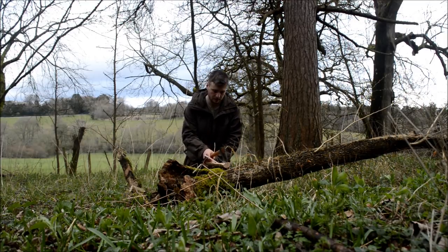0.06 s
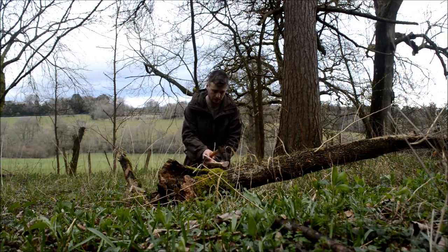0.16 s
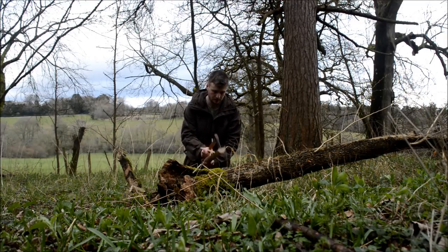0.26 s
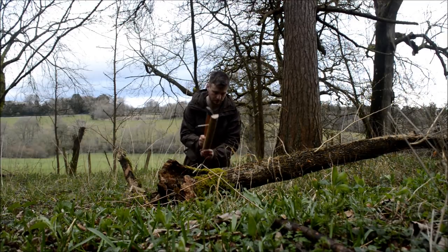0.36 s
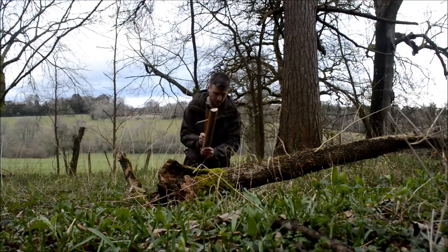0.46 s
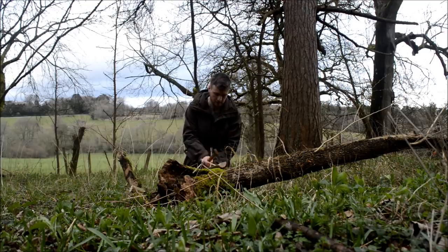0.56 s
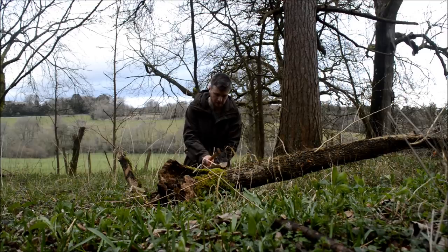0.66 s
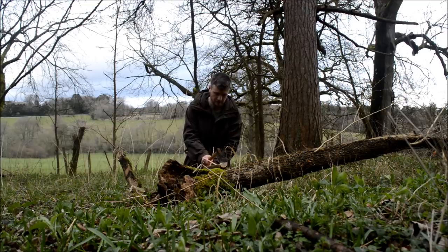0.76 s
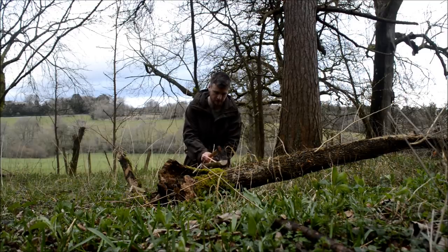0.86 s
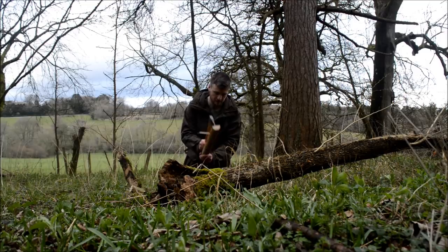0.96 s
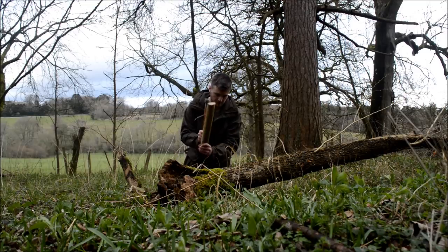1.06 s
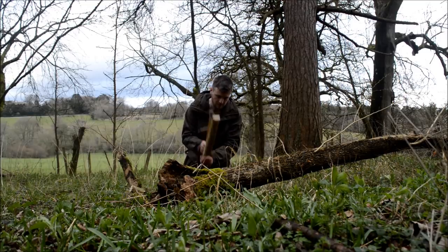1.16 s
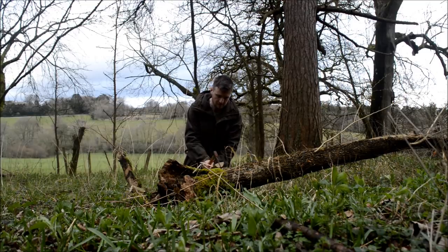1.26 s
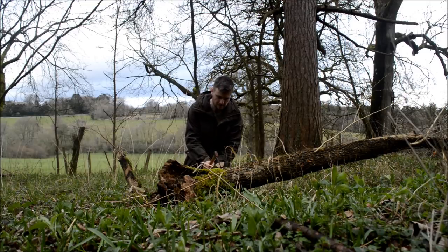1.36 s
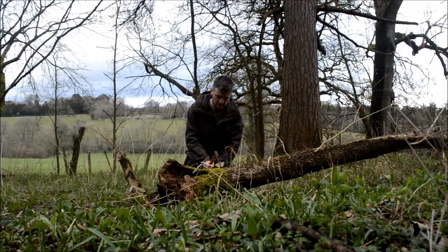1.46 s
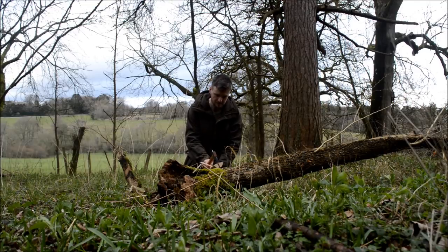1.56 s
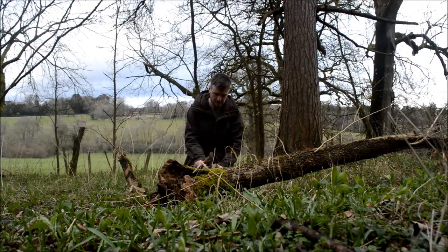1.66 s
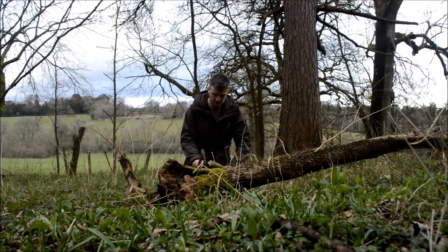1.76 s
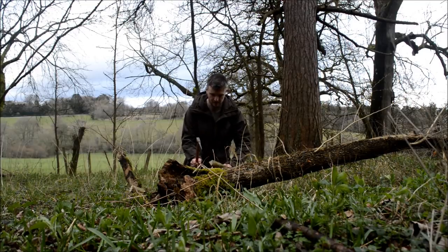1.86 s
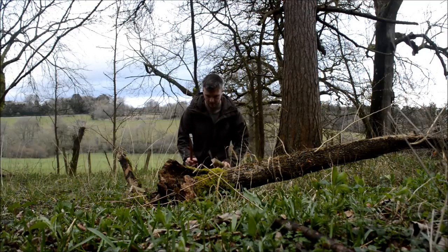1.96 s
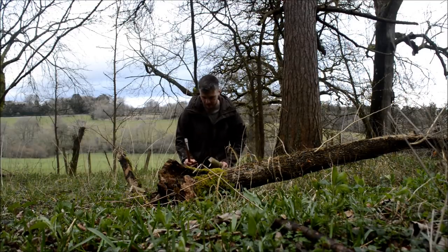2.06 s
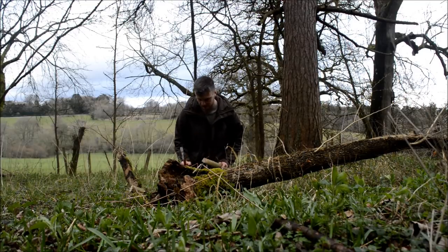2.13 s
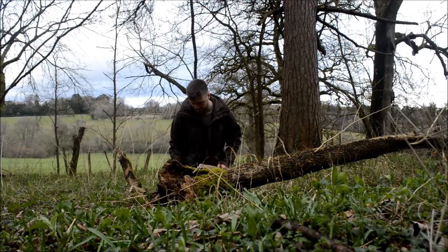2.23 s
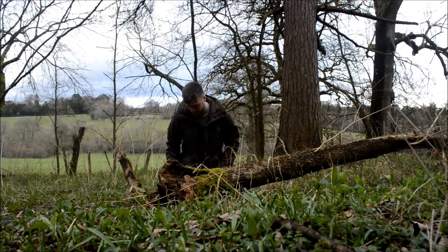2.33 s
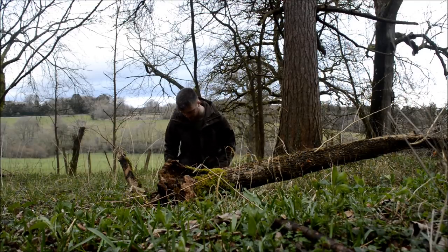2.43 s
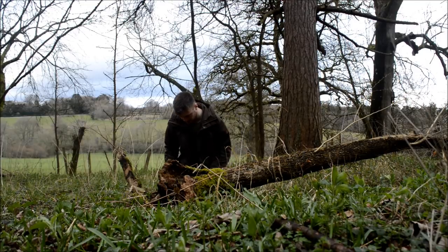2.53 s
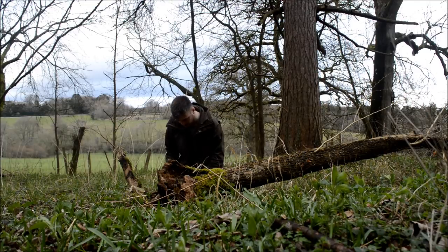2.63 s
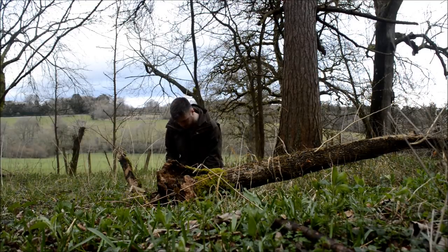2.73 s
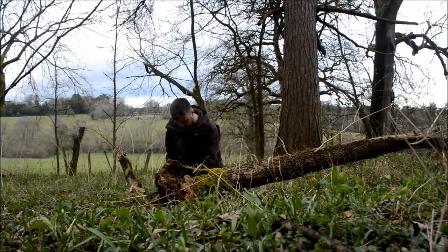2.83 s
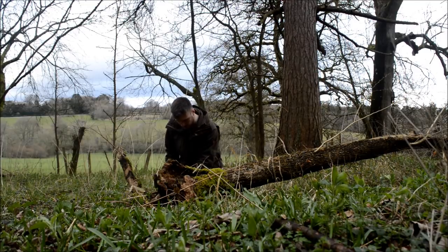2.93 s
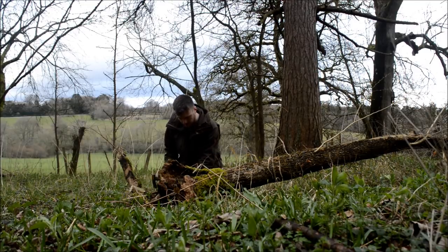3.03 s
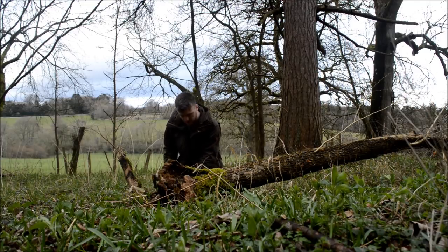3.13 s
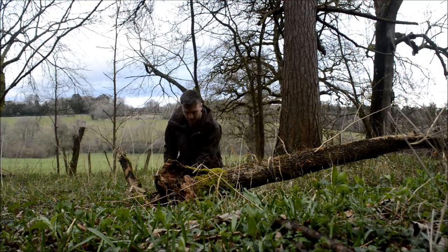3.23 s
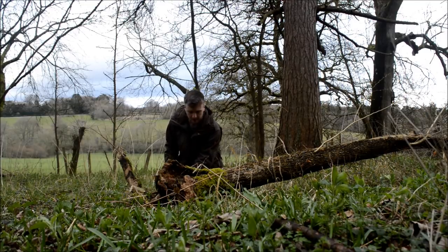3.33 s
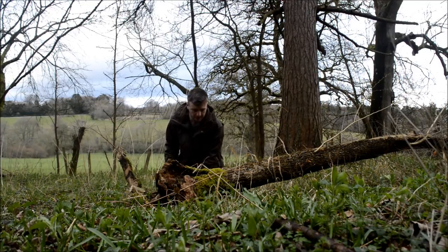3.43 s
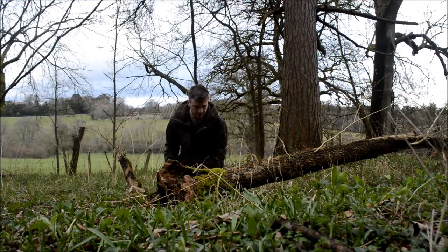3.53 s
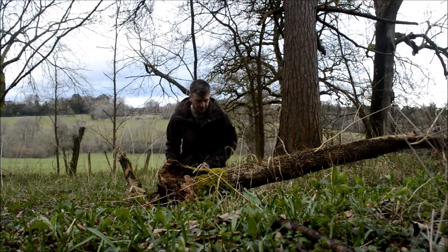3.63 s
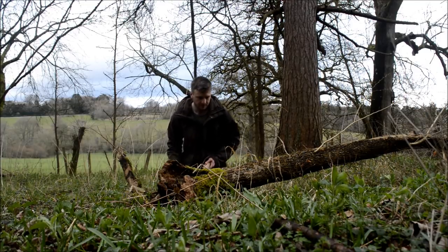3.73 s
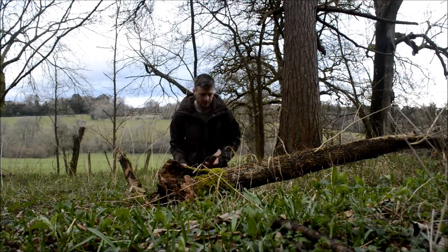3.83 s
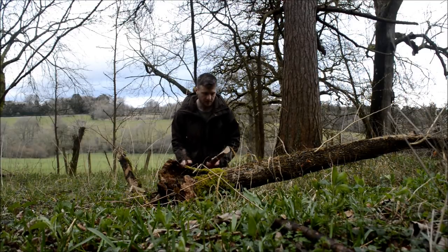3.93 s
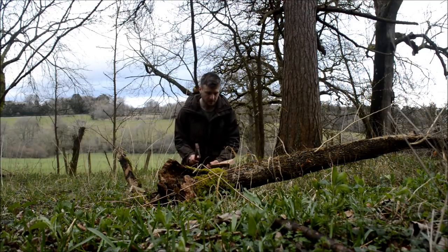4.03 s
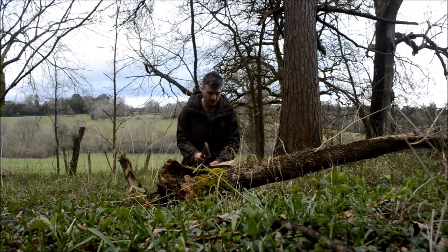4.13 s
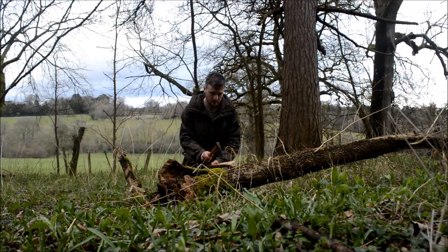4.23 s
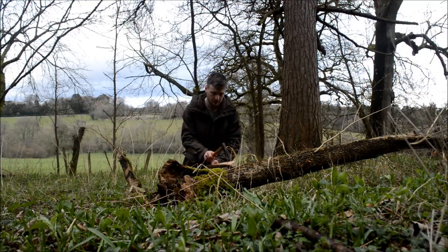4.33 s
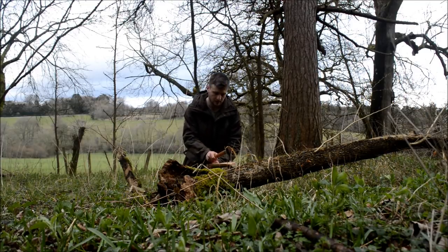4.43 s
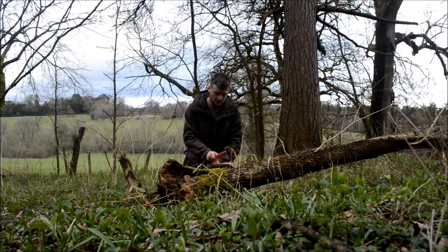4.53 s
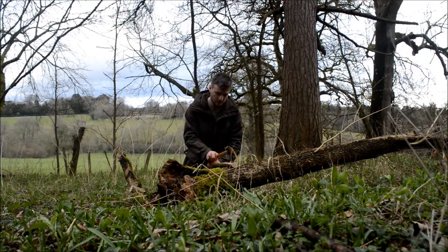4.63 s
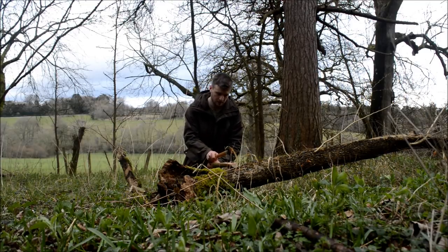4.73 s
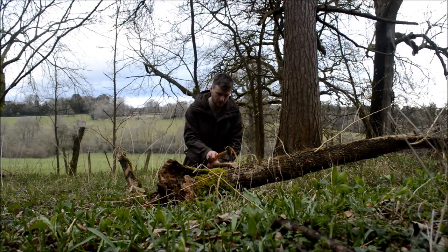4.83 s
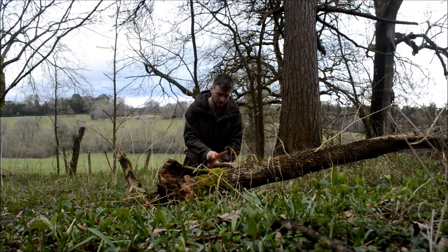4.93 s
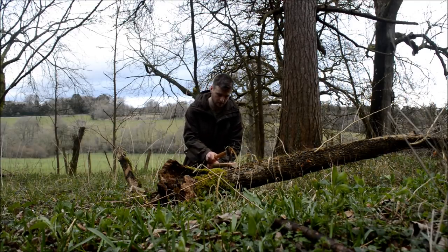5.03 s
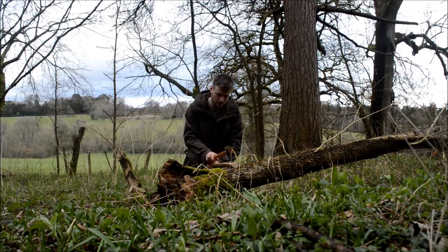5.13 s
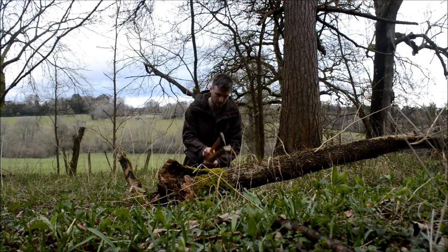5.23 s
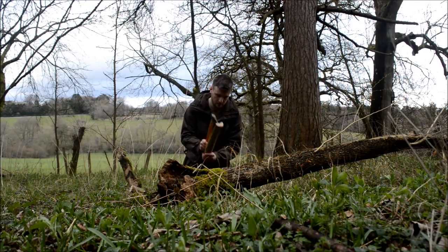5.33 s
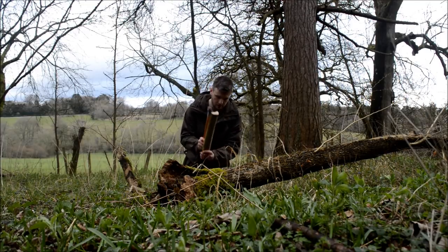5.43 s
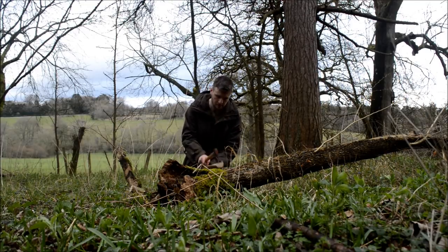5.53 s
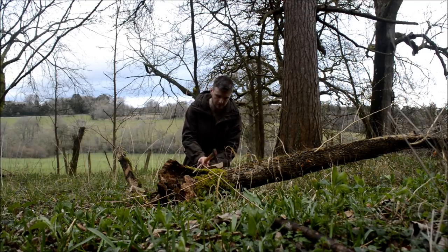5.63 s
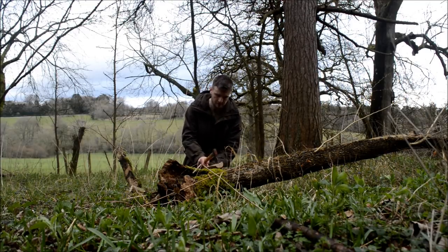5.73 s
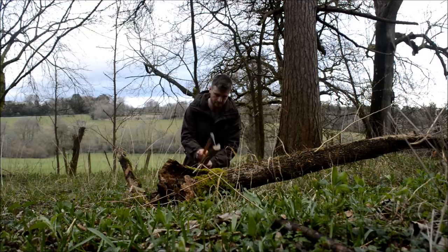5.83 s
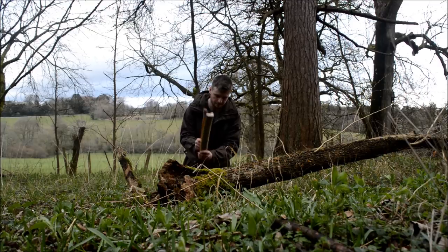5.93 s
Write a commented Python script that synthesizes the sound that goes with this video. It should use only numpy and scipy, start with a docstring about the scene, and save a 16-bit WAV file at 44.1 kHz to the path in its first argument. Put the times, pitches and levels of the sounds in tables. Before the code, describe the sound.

Two loud chops split a dry stick that rips open and drops in pieces; later another hard chop, with distant birds whistling.

```python
"""At the edge of a wood, kindling is split with a small hatchet on a fallen log, a few metres from the microphone.
Chops are sums of decaying log modes with crunching noise; the three hardest are flattened by the input stage.
The stick tears in bursts of noise, its halves ring as they drop, and a jacket swishes as filtered noise.
Distant birds are gliding sine tones. Random, decaying echoes stand for the trunks, over a noise rumble and hiss."""
import sys
import numpy as np
from scipy import signal
from scipy.fft import rfft, irfft
from scipy.io import wavfile

SR = 44100
rng = np.random.default_rng(int(sys.argv[2]) if len(sys.argv) > 2 else 0)


def wav_out(sig):
    """Save sig, one row per channel (or a flat mono array), as 16-bit PCM at SR to the path in sys.argv[1]."""
    wavfile.write(sys.argv[1], SR, np.round(np.clip(np.atleast_2d(sig).T, -1, 1) * 32767).astype(np.int16))


N = 263718


def undb(db):
    """Logarithmic level: decibels to amplitude gain."""
    return 10 ** (np.asarray(db) / 20)


def unit(x):
    """Power normalisation: scale to rms 1."""
    return x / np.sqrt(np.mean(x ** 2))


def seconds(length):
    """Uniform sampling: time axis of a short sound."""
    return np.arange(int(length * SR)) / SR


def add(track, start, sound):
    """Superposition: mix a sound into a track at a time in seconds."""
    i = int(round(start * SR))
    sound = sound[max(-i, 0):]  # drop what precedes the start of the track
    i = max(i, 0)
    track[i:i + len(sound)] += sound[:max(N - i, 0)]


def colour(points, size, tilt_db):
    """Spectral shaping: gain of each bin from (f/Hz, level/dB) points, tilted in dB per octave."""
    hz, db = np.transpose(points)
    octave = np.log2(np.maximum(np.fft.rfftfreq(size, 1 / SR), 1))
    return undb(np.interp(octave, np.log2(hz), db + tilt_db * np.log2(hz)))


def noise(points, size, tilt_db=0):
    """Random-phase synthesis: coloured noise of rms 1."""
    gain = colour(points, size, tilt_db)
    phase = 2 * np.pi * rng.random(len(gain))
    return unit(irfft(gain * np.exp(1j * phase), size))


def click(points, size, tilt_db):
    """Impulse synthesis: one coloured pulse of energy 1, centred in its frame."""
    pulse = np.fft.fftshift(irfft(colour(points, size, tilt_db), size))
    return unit(pulse) / np.sqrt(size)


def walk(rate, size=N):
    """Slow random modulation: normal values, `rate` per second, joined by straight lines."""
    knots = np.arange(size) / SR * rate
    values = rng.standard_normal(2048)
    return np.interp(knots, np.arange(len(values)), values)


def fade(t, t60):
    """Exponential damping: free decay, 60 dB in t60 seconds."""
    return np.exp(-np.log(1000) * t / t60)


def ring(modes, t, tuning, tilt_db):
    """Modal superposition: struck modes of alternating sign; a harder contact favours the upper ones."""
    pivot_hz = 500  # the tilt leaves this frequency unchanged
    total = 0
    for k, (hz, db, t60) in enumerate(modes):
        gain = (-1) ** k * undb(db + tilt_db * np.log2(hz / pivot_hz))
        total = total + gain * fade(t, t60) * np.sin(2 * np.pi * hz * tuning * t)
    return total


def burst(t, length, swell):
    """Transient envelope of a fracture: it swells to 1 at half its length and dies away."""
    u = 2 * t / length
    return (u * np.exp(1 - u)) ** swell


def whistle(length, first_hz, final_hz, slide_s):
    """Frequency modulation: a sine slides towards its final pitch, wavering in pitch and strength."""
    t = seconds(length)
    waver, flutter_db = walk(200, size=len(t)), walk(60, size=len(t))
    hz = final_hz + (first_hz - final_hz) * np.exp(-5 * (t / slide_s) ** 1.6)
    hz = hz * (1 + .007 * waver)
    tone = np.sin(2 * np.pi * np.cumsum(hz) / SR)
    return undb(flutter_db) * signal.windows.tukey(len(t), .6) * tone


# swells of the distant rumble: (t/s, relative level/dB)
RUMBLE_SWELLS = [(0.0, -59.5), (0.65, -53), (0.88, -58), (1.63, -60), (2.86, -53), (3.01, -51), (3.45, -49),
                 (3.85, -50), (4.15, -56), (4.63, -54), (5.28, -58.5), (5.7, -54), (5.98, -55)]
# spectrum of the rumble: (f/Hz, relative level/dB)
RUMBLE_SPECTRUM = [(20, -26.5), (45, -8.5), (80, -1.5), (140, -1.5), (230, -5), (330, -13.5), (600, -26),
                   (1500, -54.5)]
# spectrum of the faint hiss: (f/Hz, relative level/dB)
AIR_SPECTRUM = [(200, -3), (500, -0.5), (1000, -3), (2000, 0), (4000, -9), (9000, -13), (16000, -18)]


def countryside():
    """Stationary noise, slowly modulated: a distant rumble swells and sinks under a faint even hiss."""
    swell_db = np.interp(np.arange(N) / SR, *np.transpose(RUMBLE_SWELLS))
    rumble = noise(RUMBLE_SPECTRUM, size=N) * undb(swell_db + 0.85 + 0.4 * walk(10))
    hiss = undb(-60.0) * noise(AIR_SPECTRUM, size=N) * undb(1.3 * walk(2.0))
    return rumble + hiss


# upslurred whistles of one bird: (start t/s, length/s, held f/Hz, relative level/dB)
RISING_CALLS = [(-0.1, 0.24, 2680, -48.5), (0.35, 0.16, 2636, -48), (0.994, 0.16, 2570, -50.5),
                (1.497, 0.21, 2590, -50), (2.013, 0.25, 2584, -52.5)]
SLUR_FROM, SLUR_S = 0.85, 0.12  # starting share of the held pitch, time taken to reach it


def calling_bird():
    """Upward frequency glide: one bird repeats a call that rises to a held pitch."""
    out = np.zeros(N)
    for start, length, hz, db in RISING_CALLS:
        add(out, start, undb(db) * whistle(length, SLUR_FROM * hz, hz, SLUR_S))
    return out


# scatter from the trunks: (f/Hz, relative level/dB, t60/s before the linger factor)
TREE_SCATTER = [(100, -15, .4), (350, -1, 0.31), (690, -3, 0.48), (1250, -1.5, 0.99), (2430, -0.5, 0.95),
                (4440, -3.5, 0.69), (10000, 2, 0.38), (16400, -15.5, 0.88)]


def woodland(x, db, build_s, linger):
    """Diffuse scattering: small echoes from trunks and twigs build up and fade in clumps; soft ground eats lows."""
    t = seconds(1.4)
    hz, band_db, t60 = np.transpose(TREE_SCATTER)
    clumps = undb(2.2 * walk(130, size=len(t)))
    uneven = undb(4.2 * rng.standard_normal(len(t)))  # single echoes differ in strength
    echoes = rfft(unit(rng.standard_normal(len(t)) * uneven * clumps))
    octave = np.log2(np.maximum(np.fft.rfftfreq(len(t), 1 / SR), 1))
    tail = 0
    for k, share in enumerate(np.eye(len(hz))):  # overlapping bands that sum to 1
        band = irfft(echoes * np.interp(octave, np.log2(hz), share), len(t))
        tail = tail + undb(band_db[k]) * band * fade(t, t60[k] * linger)
    response = tail * (1 - np.exp(-t / build_s)) / np.sqrt(SR)
    return undb(db) * signal.fftconvolve(x, response)[:N]


# fluted notes of other songbirds: (start t/s, length/s, starting f/Hz, final f/Hz, relative level/dB)
SONG_NOTES = [(0.022, 0.22, 2030, 1904, -58.5), (0.134, 0.29, 3060, 3130, -60.5),
              (0.849, 0.15, 3020, 3134, -57.5), (2.309, 0.094, 1950, 1597, -54),
              (2.408, 0.2, 2020, 2090, -55.5), (2.655, 0.139, 2164, 1993, -55),
              (2.967, 0.088, 2320, 2200, -57.5), (4.618, 0.14, 1870, 1977, -49),
              (4.732, 0.054, 1890, 1740, -46.5), (4.892, 0.086, 2148, 2030, -48.5),
              (4.907, 0.077, 1712, 1780, -48), (4.971, 0.066, 1818, 2090, -45.5),
              (5.038, 0.12, 2060, 2226, -42), (5.155, 0.06, 2520, 2577, -60.5),
              (5.334, 0.038, 2120, 1694, -49), (5.389, 0.16, 1340, 1393, -49.5),
              (5.632, 0.085, 3350, 3077, -46.5), (5.836, 0.11, 4120, 4440, -54.5)]


def songbirds():
    """Frequency glides: fluted notes slide up or down in short phrases."""
    out = np.zeros(N)
    for start, length, first_hz, final_hz, db in SONG_NOTES:
        add(out, start, undb(db) * whistle(length, first_hz, final_hz, length))
    return out


# arm movements that rub the jacket: (t/s of greatest speed, length/s, relative level/dB)
ARM_MOVES = [(0.39, 0.21, -61), (1.05, 0.25, -56), (2.2, 0.051, -49.5), (2.65, 0.88, -55.5),
             (3.1, 0.18, -63), (3.26, 0.24, -58), (3.58, 0.43, -49), (3.98, 0.44, -56.5), (4.2, 0.62, -57),
             (5.39, 0.43, -60.5), (5.95, 0.23, -58.5)]
# fabric sliding: (f/Hz, relative level/dB)
CLOTH_SPECTRUM = [(500, -15), (1300, -9), (2800, 0), (4500, -4), (6500, -3), (9400, 3), (12000, -8),
                  (16000, -22)]
SPEED_UP_SHARE, RUB_POWER = 0.55, 1.98  # part of a movement spent speeding up; rubbing power = speed ** RUB_POWER
SWING_S, SWING_DB = 0.16, -55.5  # movement of each blow, fastest at the strike: length, level added to the blow's


def jacket():
    """Friction noise: fabric slides over itself as an arm speeds up and slows down, catching a little."""
    t, rubbing = np.arange(N) / SR, np.zeros(N)
    swings = [(start, SWING_S, db + SWING_DB) for start, db, *_ in HATCHET_BLOWS]
    for fastest, length, db in [*ARM_MOVES, *swings]:
        speed = np.interp((t - fastest) / length, [-SPEED_UP_SHARE, 0, 1 - SPEED_UP_SHARE], [0, 1, 0])
        rubbing += undb(db) ** 2 * speed ** RUB_POWER  # powers add
    catching = undb(1.2 * walk(70))
    return undb(2.5) * np.sqrt(rubbing) * noise(CLOTH_SPECTRUM, size=N) * catching


# hatchet blows: (t/s, relative level/dB, log tuning factor, upper modes' tilt/dB per octave,
# crunch level/dB, crunch length/s, stick f/Hz, stick level/dB, echo level/dB), the last levels relative to the blow
HATCHET_BLOWS = [(0.5772, -2, 1.04, -2.5, -10.5, 0.0036, 1094, -11, 15),
                 (1.2425, -4, 1.1, 0.9, 4, 0.0023, 2570, -11, 21),
                 (4.0345, -25.5, 0.99, -9, -14.5, 0.0027, 578, -10, 23.5),
                 (4.495, -31.5, 1.45, -7.5, -17, 0.0037, 1647, -3.5, 6.5),
                 (5.5522, -2, 1.035, -1.6, -8.5, 0.0023, 1516, -4, 14.5),
                 (5.571, -20, 1, -7, -32, 0.0035, 1460, -14, 4),
                 (5.595, -19, 1.14, -8.5, -22, 0.0027, 1450, -19, 5)]
# modes of the log under the blade: (f/Hz before tuning, level/dB before tilt, t60/s)
LOG_RESONANCES = [(326, -2.5, 0.025), (429, 4, 0.0097), (542, -4, 0.019), (834, -6, 0.02),
                  (1126, -10, 0.016), (1486, -1.5, 0.019), (1600, -10, 0.012), (1898, -4.5, 0.021),
                  (2122, -8, .022), (2605, -13, 0.016), (2954, -7, 0.017)]
# fibres crushed by the blade: (f/Hz, relative level/dB)
CRUNCH_SPECTRUM = [(60, -21), (300, -7.5), (1000, 2.5), (2500, -1.5), (4500, -3.5), (6500, -8), (9000, 1),
                   (11500, -10.5), (16000, -21)]
# a chop, summed over all directions, before tilt: (f/Hz, relative level/dB)
RADIATED_SPECTRUM = [(100, -6.5), (350, 5.5), (700, -1), (1300, 1), (2500, -4), (4500, -8), (9000, -8),
                     (16000, -20.5)]


def hatchet():
    """Impact excitation: a blow rings log and stick as the blade crunches; returns direct sound and tree input."""
    direct, thuds, spread, t = np.zeros(N), np.zeros(N), np.zeros(N), seconds(.2)
    # steel meets wood: one hard swing of the waveform
    contact = undb(2.5) * fade(t, 0.0033) * np.sin(2 * np.pi * 1150 * t)
    low_tones = np.sin(2 * np.pi * 105 * t) - np.sin(2 * np.pi * 210 * t)
    thud = undb(-30.5) * burst(t, 0.0023, swell=0.7) + undb(-29.5) * fade(t, 0.11) * low_tones
    for start, db, tuning, tilt_db, crunch_db, length, stick_hz, stick_db, echo_db in HATCHET_BLOWS:
        crunch = undb(crunch_db) * noise(CRUNCH_SPECTRUM, size=len(t)) * burst(t, length, swell=0.84)
        stick = undb(stick_db) * burst(t, .0055, swell=1.6) * np.sin(2 * np.pi * stick_hz * t)
        log = ring(LOG_RESONANCES, t, tuning, tilt_db)
        add(direct, start, undb(db) * (undb(2 * tilt_db) * contact + log + stick + crunch))
        add(thuds, start, undb(db) * thud)
        pulse = click(RADIATED_SPECTRUM, size=256, tilt_db=0.69 * tilt_db)
        add(spread, start, undb(db + echo_db) * pulse)
    # the ringing wood radiates little bass; the thud of the log on the ground supplies it
    high_pass = signal.butter(N=2, Wn=170, btype="high", fs=SR, output="sos")
    return signal.sosfilt(high_pass, direct) + thuds, spread


# thin notes of a small bird deeper in the wood: (start t/s, final f/Hz)
PIPING_NOTES = [(0.769, 4450), (2.48, 4240), (2.889, 4330), (4.53, 4450), (4.811, 4640), (5.86, 4820)]
PIPING_S, PIPING_FROM, PIPING_DB = 0.13, 0.93, -62.5  # length, starting share of final pitch, relative level


def piping():
    """Upward frequency glide: faint high notes share one contour."""
    out = np.zeros(N)
    for start, hz in PIPING_NOTES:
        add(out, start, undb(PIPING_DB) * whistle(PIPING_S, PIPING_FROM * hz, hz, PIPING_S))
    return out


# the stick tears along the grain: start, jerk spacing, and the first jerk's relative level, length, tilt (dB/octave)
TEAR_START_S, JERK_GAP_S, JERK_DB, JERK_LENGTH_S, JERK_TILT_DB = 1.6163, 0.0063, -14.5, 0.00099, 2.5
# as the split opens jerks weaken (dB per doubling of number), lengthen (power of number), dull (dB per octave each)
JERK_WEAKEN_DB, JERK_STRETCH, JERK_DULL_DB = 2.0, 0.52, 0.5
# crack that opens a jerk: first relative level, length, dB lost per doubling of the number
CRACK_DB, CRACK_S, CRACK_WEAKEN_DB = -10, 0.00023, 6
SPLINTER_LOW_HZ, SPLINTER_HIGH_HZ = 4500, 9600  # range in which the splinters ring


def tear(count):
    """Stick-slip fracture: evenly spaced, cracking jerks grow weaker, longer, duller; rows as in FIBRE_SNAPS."""
    k = np.arange(count)
    start, doublings = TEAR_START_S + k * JERK_GAP_S, np.log2(k + 1)
    tilt_db = JERK_TILT_DB - JERK_DULL_DB * k
    splinter_hz = rng.uniform(SPLINTER_LOW_HZ, SPLINTER_HIGH_HZ, count)
    crack_db = CRACK_DB - CRACK_WEAKEN_DB * doublings
    cracks = zip(start, crack_db, np.full(count, CRACK_S), tilt_db, splinter_hz)
    spray_db = JERK_DB - JERK_WEAKEN_DB * doublings
    spray_s = JERK_LENGTH_S * (k + 1) ** JERK_STRETCH
    sprays = zip(start, spray_db, spray_s, tilt_db, splinter_hz)
    return [*cracks, *sprays]


# last bundles of fibres snapping: (t/s, relative level/dB, length/s, tilt/dB per octave, splinter f/Hz)
FIBRE_SNAPS = [(1.699, -30.5, 0.00066, -2, 9650), (1.97, -45.5, 0.0086, 8, 9700),
               (2.0294, -47.5, 0.0026, 0, 9440), (2.0445, -39.5, 0.0019, 6, 7800),
               (2.2207, -16.5, 0.00091, 6, 9400), (2.2226, -19.5, 0.0019, 10, 9200),
               (2.265, -46, 0.007, -4.5, 1560)]
# dry fibres breaking, before tilt: (f/Hz, relative level/dB)
SNAP_SPECTRUM = [(100, -42.5), (400, -3.5), (750, -20.5), (1300, -5.5), (2100, 0.5), (3000, 2), (4500, 4.5),
                 (6500, 1), (9200, 7.5), (11500, -1.5), (16000, -18)]


def splitting():
    """Brittle fracture: each jerk down the grain sprays breaking fibres that excite a splinter resonance."""
    out, t = np.zeros(N), seconds(.08)
    for start, db, length, tilt_db, splinter_hz in [*tear(count=8), *FIBRE_SNAPS]:
        fibres = noise(SNAP_SPECTRUM, size=len(t), tilt_db=tilt_db) * undb(2.4 * walk(1000, size=len(t)))
        splinter = signal.lfilter(*signal.iirpeak(splinter_hz, 4.5, fs=SR), fibres)
        spray = unit(fibres + undb(-2.0) * splinter)
        add(out, start, undb(db) * spray * burst(t, length, swell=0.39))
    return out


# split halves dropped on the log: (t/s, relative level/dB, tuning factor, upper modes' tilt/dB per octave)
HALF_DROPS = [(2.3913, -39, 1.05, -1.5), (2.4250, -45, 0.98, -9), (2.552, -31.5, 1.0, 3)]
# modes of a loose half: (f/Hz before tuning, level/dB before tilt, t60/s)
STICK_RESONANCES = [(490, -5.5, 0.26), (648.5, 1.5, 0.18), (795, -1, 0.023), (1058, -11.5, 0.14),
                    (1360, -10, 0.042), (1710, -20, 0.056), (1830, -26, 0.22)]


def halves():
    """Free modal vibration: loose pieces land with a dull tick and ring like wooden bars."""
    out, t = np.zeros(N), seconds(.4)
    for start, db, tuning, tilt_db in HALF_DROPS:
        tick = undb(-5.5) * noise(SNAP_SPECTRUM, size=len(t), tilt_db=-5) * fade(t, 0.021)
        add(out, start, undb(db) * (ring(STICK_RESONANCES, t, tuning, tilt_db) + tick))
    return out


def scene():
    """Direct and scattered fields: the woodwork is near and direct; the birds arrive largely via the trees."""
    chops, spread = hatchet()
    snaps, drops = splitting(), halves()
    song = calling_bird() + songbirds() + piping()
    into_trees = spread + undb(1.0) * snaps + undb(2.5) * drops
    echo = woodland(into_trees, db=2.5, build_s=0.011, linger=1.0)
    far = undb(-1.0) * song + woodland(song, db=12.0, build_s=0.006, linger=1.4)
    return (chops + snaps + drops + jacket() + echo + far + countryside())[None]


TOP_HZ = 15900  # edge of the low-pass


def record(dry):
    """Amplitude saturation and low-pass filtering: the input stage flattens the chops; the top is cut."""
    ceiling, knee = .54, 6  # limiting amplitude, sharpness of the bend
    clipped = dry / (1 + np.abs(dry / ceiling) ** knee) ** (1 / knee)
    return signal.sosfilt(signal.ellip(10, .2, 70, TOP_HZ, fs=SR, output="sos"), clipped)


dry = scene()
out = record(dry)
wav_out(out)
```